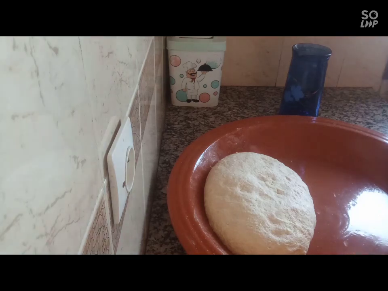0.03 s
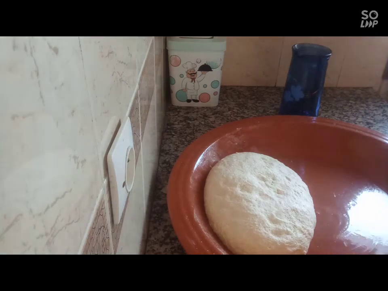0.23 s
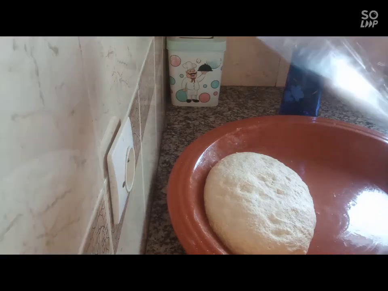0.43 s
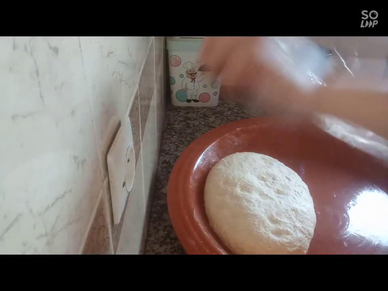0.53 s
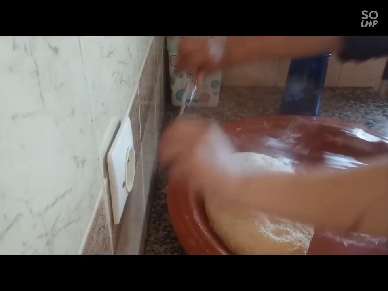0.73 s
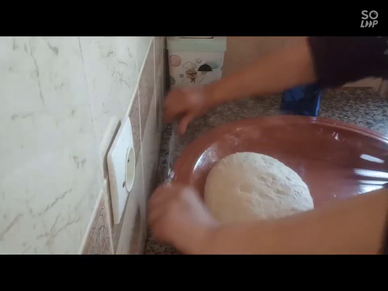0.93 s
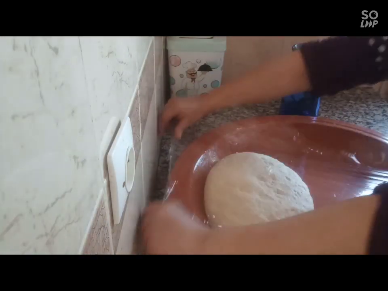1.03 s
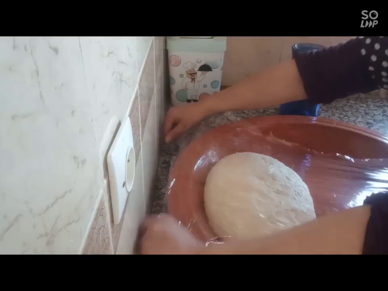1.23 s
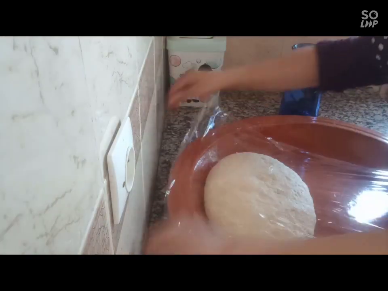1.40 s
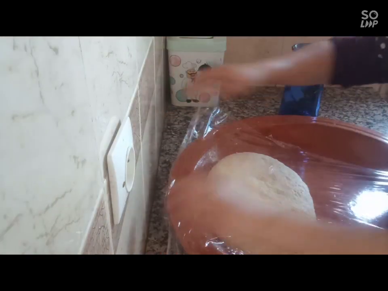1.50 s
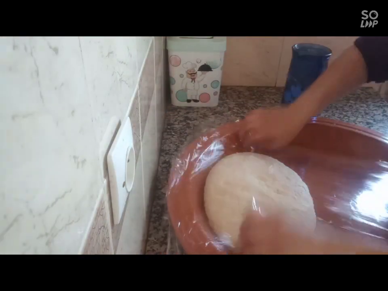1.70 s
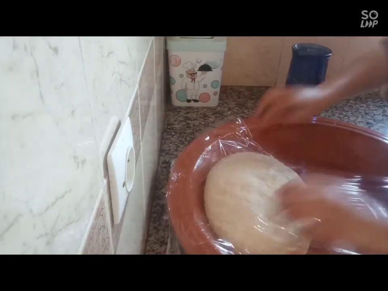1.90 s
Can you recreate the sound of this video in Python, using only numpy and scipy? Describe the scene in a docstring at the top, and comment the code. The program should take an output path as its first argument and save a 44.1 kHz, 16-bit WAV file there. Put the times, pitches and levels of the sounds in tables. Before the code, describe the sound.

Cling film peels off its roll in short pulls, crinkling and snapping over a dish.

```python
"""Cling film peels off its roll in four pulls of dense stick-slip and is drawn over a clay dish.
The sheet rustles and squeaks faintly as it tightens, its creases snap and crinkle around the rim,
and the taut film rings like a slack drum. The roll knocks twice on the worktop and booms in the
corner of a small tiled kitchen, which rings over a low hum."""
import sys
import numpy as np
from scipy import signal
from scipy.fft import rfft, irfft, next_fast_len
from scipy.io import wavfile

SR = 44100
rng = np.random.default_rng(int(sys.argv[2]) if len(sys.argv) > 2 else 0)


def wav_record(signal):
    """Record a signal, one row per channel, as 16-bit PCM in the file named by sys.argv[1]."""
    frames = np.transpose(np.atleast_2d(signal))
    bounded = np.clip(frames, -1, 1)
    # unit amplitude maps onto the largest positive 16-bit level
    quanta = np.round(bounded * 32767).astype(np.int16)
    wavfile.write(sys.argv[1], SR, quanta)


N = 85995


def amp(db):
    """Decibels to gain."""
    return 10 ** (np.asarray(db) / 20)


def unit(x):
    """Scale to rms 1."""
    return x / np.sqrt(np.mean(x ** 2) + 1e-20)


def along(points, hz):
    """Read a curve of (Hz, value) points on a log frequency axis."""
    f, v = np.transpose(points)
    return np.interp(np.log(hz + 1), np.log(f + 1), v)


def since(start):
    """Seconds elapsed after start, zero before."""
    return np.maximum(np.arange(N) / SR - start, 0)


def colour(x, gain):
    """Minimum-phase filter of unit energy, shaped by gain(Hz): nothing rings ahead of an attack."""
    size = 2 * next_fast_len(N)
    magnitude = np.maximum(unit(gain(np.fft.rfftfreq(size, 1 / SR))), 1e-6)
    cepstrum = irfft(np.log(magnitude))[:size // 2]
    cepstrum[1:] *= 2
    return irfft(rfft(x, size) * np.exp(rfft(cepstrum, size)))[:N]


def shaped(x, points):
    """Colour x with an EQ curve of (Hz, dB) points."""
    return colour(x, lambda f: amp(along(points, f)))


def resonance(f, hz, q):
    """Gain of two like resonances in series."""
    return 1 / (1 + (q * (f / hz - hz / (f + 1))) ** 2)


def crackle(per_s, spread_db):
    """Random tiny impulses of uneven size, rms 1."""
    chance, size, sign = rng.random(N), rng.standard_normal(N), rng.choice([-1, 1], N)
    return unit((chance < per_s / SR) * sign * amp(spread_db * np.clip(size, -2, 2)))


def ring(modes, start, rise_s=0.0011):
    """Damped modes, struck together at start."""
    t = since(start)
    tones = sum(amp(db - 60 * t / t60) * np.sin(2 * np.pi * hz * t) for hz, db, t60 in modes)
    return tones * (1 - np.exp(-t / rise_s))


def room(x, wet_db):
    """Add the tiled kitchen's reverb, a noise tail that lasts longest in the bass."""
    # Each row: frequency in Hz, seconds to fall 60 dB.
    decay_times = [(100, 1), (300, 0.54), (1000, 0.57), (4000, 0.58), (14000, 0.52)]
    hz, t, noise = signal.stft(rng.standard_normal(SR * 3 // 4), SR, nperseg=256)
    decay = amp(-60 * t / along(decay_times, hz)[:, None])
    tail = signal.istft(noise * decay, SR, nperseg=256)[1]
    return x + amp(wet_db) * signal.fftconvolve(x, tail / np.linalg.norm(tail))[:N]


def room_tone(noise_db=-58, hum_db=-65.5, hum_hz=97):
    """A quiet bed of dark noise with a steady low hum."""
    # Each row: frequency in Hz, relative level in dB.
    noise_eq = [(25, -21), (60, 3.5), (100, 2.5), (150, -4.5), (220, 0.5), (320, -12), (900, -12),
                (2000, -19.5), (5000, -24.5), (15000, -38)]
    noise = amp(noise_db) * shaped(rng.standard_normal(N), noise_eq)
    return noise + amp(hum_db) * np.sin(2 * np.pi * hum_hz * since(0))


def corner_boom(hz=97.46, rise_s=0.017, t60_s=0.59):
    """Each bump of the roll sets the corner's lowest standing wave swelling and fading."""
    # Each row: start in seconds, level in dB.
    bumps = [(.01, -37), (.248, -25.5), (.602, -35.5)]
    out = np.zeros(N)
    for start, db in bumps:
        t = since(start)
        envelope = amp(db - 60 * t / t60_s) * (1 - np.exp(-t / rise_s))
        out += envelope * np.sin(2 * np.pi * hz * t)
    return out


def roll_knocks(ring_db=-5, thud_db=-1, thud_t60_s=0.071):
    """Each contact of the roll gives a dull thud and rings the worktop; soft ones keep only the lows."""
    # Each row: start in seconds, level in dB, cut-off in Hz (lower for a softer contact).
    contacts = [(0.2406, -15.5, 1170), (0.2477, -17, 580), (0.5893, -38.5, 785), (0.5992, -37, 275),
                (.617, -33.5, 110)]
    # Worktop and roll. Each row: frequency in Hz, relative level in dB, seconds to fall 60 dB.
    worktop_modes = [(115, -10, 0.19), (218, -17, 0.74), (234, -3, .17), (246.3, -5.5, 0.28),
                     (322, -5, 0.39), (400, -11, 0.52), (451, -2, 0.25), (490, 1, 0.34), (500, -13, 0.27),
                     (687.6, -3, 0.18), (824, -16, 0.23), (980, -22, 0.41), (1290, -13.5, 0.063),
                     (2260, -4, 0.045)]
    # Each row: frequency in Hz, relative level in dB.
    thud_eq = [(40, -42.5), (110, 0.5), (150, -12.5), (220, 2.5), (360, -6), (480, -2.5), (700, -4),
               (1000, -11), (2200, -18), (5000, -15.5), (15000, -48)]
    rings, thuds = np.zeros(N), np.zeros(N)
    for start, db, cutoff_hz in contacts:
        lowpass = lambda f: 1 / np.sqrt(1 + (f / cutoff_hz) ** 3)
        softened = [(hz, level + 20 * np.log10(lowpass(hz)), t60) for hz, level, t60 in worktop_modes]
        rings += amp(db) * ring(softened, start)
        t = since(start)
        burst = rng.standard_normal(N) * (t > 0) * amp(db + thud_db - 60 * t / thud_t60_s)
        thuds += colour(burst, lambda f: amp(along(thud_eq, f)) * lowpass(f))
    return amp(ring_db) * rings + room(thuds, wet_db=-4)


def film_rustle():
    """The loose sheet crackles finely as it moves, and squeaks faintly as it tightens."""
    # Each row: time in seconds, rustle level in dB.
    movement = [(0, -37), (.21, -56.5), (.3, -57), (.45, -58), (.55, -68.5), (.68, -60), (.8, -54.5),
                (.9, -48), (1.05, -51.5), (1.2, -77), (1.4, -68), (1.54, -70.5), (1.6, -52), (1.68, -58),
                (1.76, -59.5), (1.82, -73), (1.95, -76)]
    # Each row: frequency in Hz, relative level in dB.
    sheet_eq = [(200, 1), (800, 5.5), (1600, -4.5), (2200, -3), (4000, -2.5), (7000, -5.5), (15000, -17.5)]
    # Each row: centre in seconds, half length in seconds, resonance in Hz, its Q, level in dB.
    squeaks = [(0.78, 0.049, 1550, 4, -54), (0.815, 0.052, 4080, 22, -54.5)]
    t = since(0)
    envelope = amp(np.interp(t, *np.transpose(movement)))
    out = shaped(crackle(per_s=4000, spread_db=4.5) * envelope, sheet_eq)
    for centre, half_length, hz, q, db in squeaks:
        rub = rng.standard_normal(N) * amp(db) * np.exp(-((t - centre) / half_length) ** 2)
        out += colour(rub, lambda f: resonance(f, hz, q))
    return room(out, wet_db=-4.5)


def film_drum():
    """The film, pulled taut over the dish, rings like a slack drum."""
    # Each row: start in seconds, level in dB.
    plucks = [(1.556, -49), (1.568, -34)]
    # Each row: frequency in Hz, relative level in dB, seconds to fall 60 dB.
    membrane_modes = [(132, -12, 0.28), (224, -1, 0.25), (257, -5.5, .15), (324, -3, 0.12),
                      (513, -14, 0.13)]
    return room(sum(amp(db) * ring(membrane_modes, start) for start, db in plucks), wet_db=-14.5)


def crease_snaps(rise_s=0.00063, wall_delay_s=0.0034, wall_db=-4):
    """A crease gives way in a short avalanche of tiny buckles; the near wall repeats the burst at once."""
    # Each row: start in seconds, level in dB, seconds to fall 20 dB, treble cut in dB per octave.
    snaps = [(0.05, -44, 0.013, 7), (0.055, -33.5, 0.0086, -7.5), (0.11, -38, 0.014, 1.5),
             (.179, -40, 0.015, 0), (0.2182, -33.5, 0.022, 1.5), (0.2419, -26.5, 0.0064, 3),
             (0.26, -27.5, 0.011, 4.5), (0.347, -44, .015, 8), (0.4126, -42, 0.024, -3),
             (0.9322, -32.5, 0.014, 1.5), (0.9865, -31, .014, -0.5), (1.115, -44, 0.022, -5),
             (1.126, -41.5, 0.019, -0.5), (1.25, -50.5, .012, -1), (1.541, -45.5, 0.068, 3),
             (1.5536, -24.5, 0.017, 0.5), (1.57, -36.5, 0.049, 2), (1.588, -30, 0.017, 1),
             (1.926, -40, 0.049, 1), (1.938, -39.5, 0.088, 4), (1.947, -20, .02, 3)]
    # Each row: frequency in Hz, relative level in dB.
    crease_eq = [(60, -11), (250, -1), (700, 1), (1200, 3), (2000, 1.5), (3500, 2), (7000, 1.5),
                 (15000, -6.5)]
    out = np.zeros(N)
    for start, db, fall_s, tilt_db in snaps:
        burst = lambda t: (1 - np.exp(-t / rise_s)) * amp(db - 20 * t / fall_s)
        echo = amp(wall_db) * burst(since(start + wall_delay_s))
        envelope = np.hypot(burst(since(start)), echo)
        buckles = crackle(per_s=5000, spread_db=4) * envelope
        snap = colour(buckles, lambda f: amp(along(crease_eq, f) - tilt_db * np.log2(1 + f / 1000)))
        out += room(snap, wet_db=-3)
    return out


def film_peel(attack_s=0.0017, slips_per_s=1500):
    """Stick-slip at the roll sounds the stretched sheet, the hollow core and a fine fizz."""
    # Each row: start in seconds, hold in seconds, level in dB, sheet resonance in Hz, its Q,
    # core and fizz in dB against the sheet, fade in dB per second.
    pulls = [(0.0, 0.048, -41.5, 680, 0.77, 1.5, -4.5, 88),
             (0.809, 0.073, -39.5, 1196, 1.77, -6, -21.5, 200),
             (0.989, 0.058, -40.5, 1120, 1.4, -2.5, -23, 112),
             (1.212, 0.077, -45, 933, 1.34, -2, -22.5, 108)]
    # Each row of both curves: frequency in Hz, relative level in dB.
    core_eq = [(40, -21), (75, -6), (105, -5), (145, -9), (200, 0), (255, -2), (350, -13.5), (480, -4),
               (700, -13), (1500, -27), (4000, -61)]
    fizz_eq = [(300, -16), (1500, -15), (3000, 3.5), (6000, -2), (15000, -4)]
    out = np.zeros(N)
    for start, hold, db, hz, q, core_db, fizz_db, fade_db_per_s in pulls:
        attack = 1 - np.exp(-since(start) / attack_s)
        effort = attack * amp(db - fade_db_per_s * since(start + hold))
        sheet = colour(crackle(slips_per_s, spread_db=3) * effort, lambda f: resonance(f, hz, q))
        core = shaped(crackle(slips_per_s, spread_db=3) * effort, core_eq)
        fizz = shaped(crackle(per_s=4200, spread_db=9) * effort, fizz_eq)
        out += sheet + amp(core_db) * core + amp(fizz_db) * fizz
    return room(out, wet_db=-2)


def scene():
    """Film and roll over the kitchen's room tone, in mono."""
    action = film_peel() + roll_knocks() + corner_boom() + crease_snaps() + film_drum() + film_rustle()
    return (action + room_tone())[None]


def record(dry):
    """A small microphone with a presence peak and a steep band limit."""
    # Each row: frequency in Hz, gain in dB.
    microphone_eq = [(30, -13.5), (100, 2.5), (3300, -1.5), (4900, -8.5), (6000, -4.5), (7600, 3.5),
                     (9000, -4), (11000, -6), (14500, 0), (16000, -6)]
    top_hz = 15650
    size = 2 * next_fast_len(N)
    hz = np.fft.rfftfreq(size, 1 / SR)
    response = amp(along(microphone_eq, hz)) * (hz < top_hz)
    return irfft(rfft(dry, size) * response, size)[:, :N]


dry = scene()
out = record(dry)
wav_record(out)
```